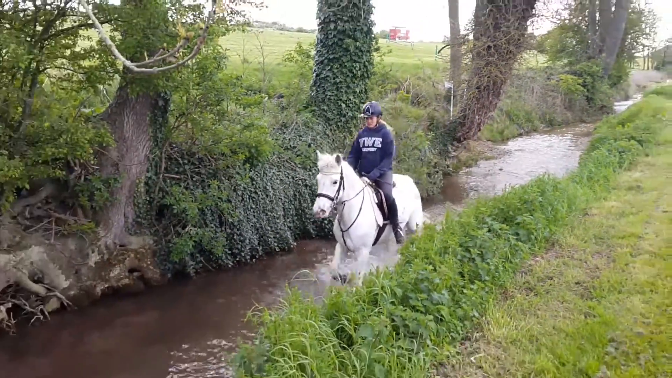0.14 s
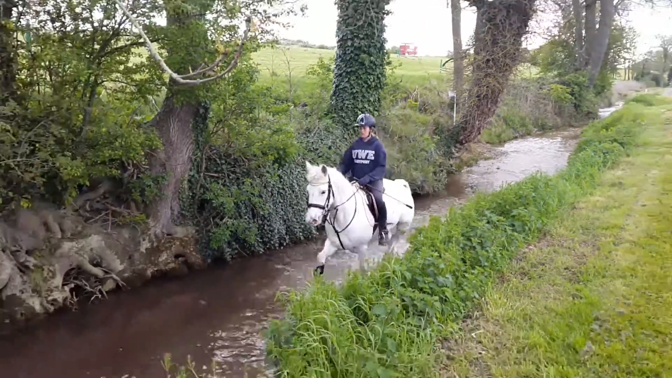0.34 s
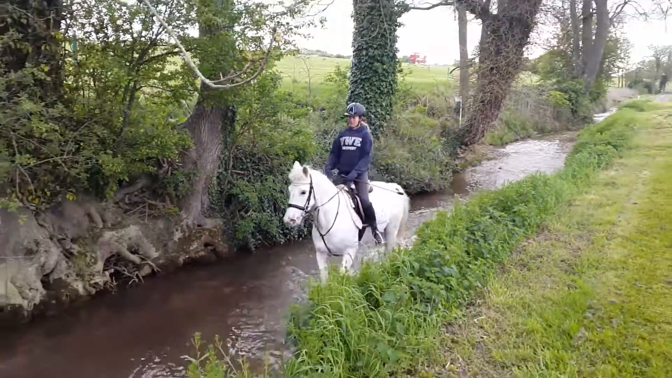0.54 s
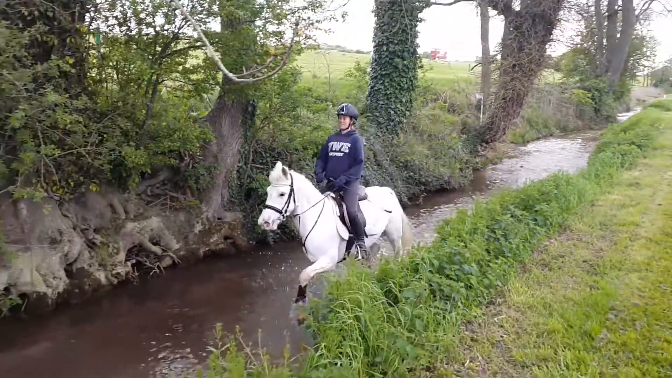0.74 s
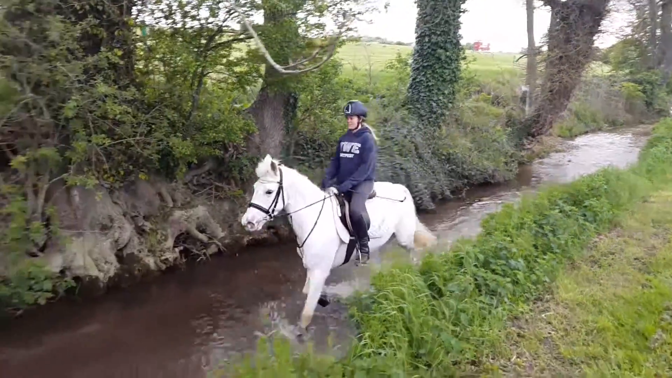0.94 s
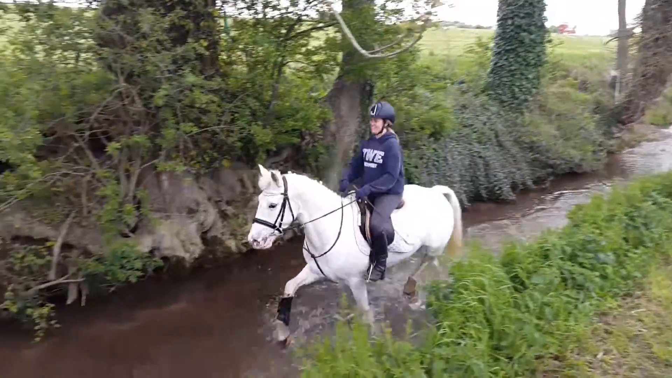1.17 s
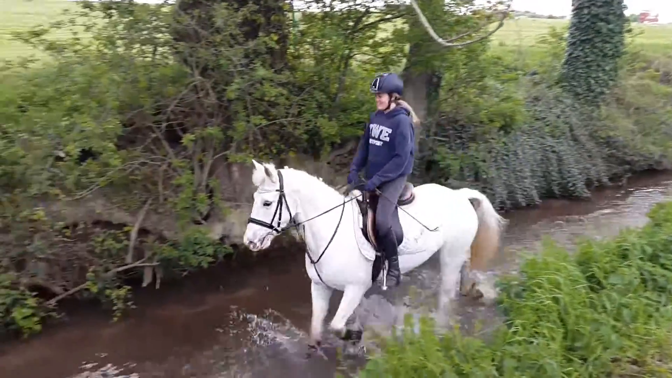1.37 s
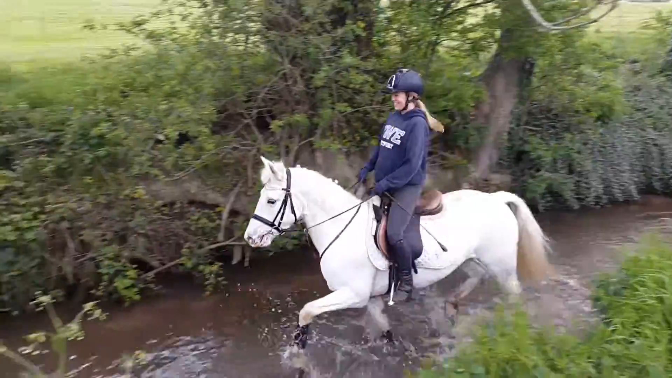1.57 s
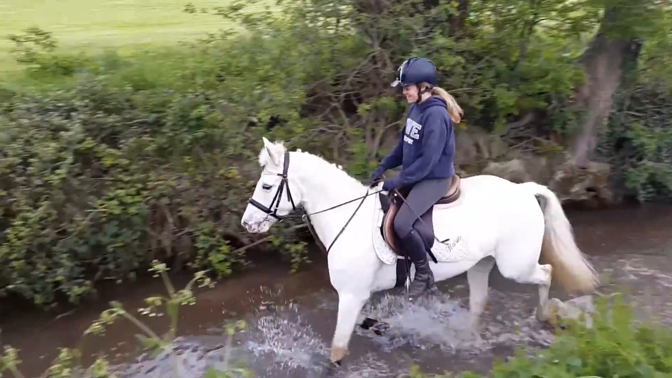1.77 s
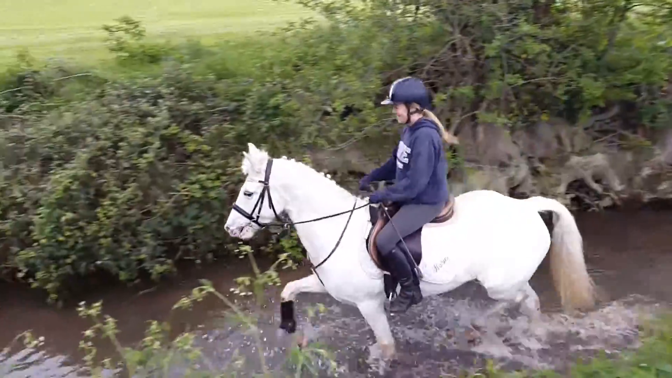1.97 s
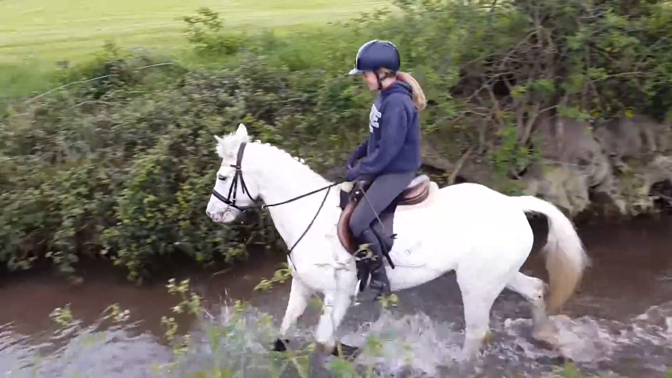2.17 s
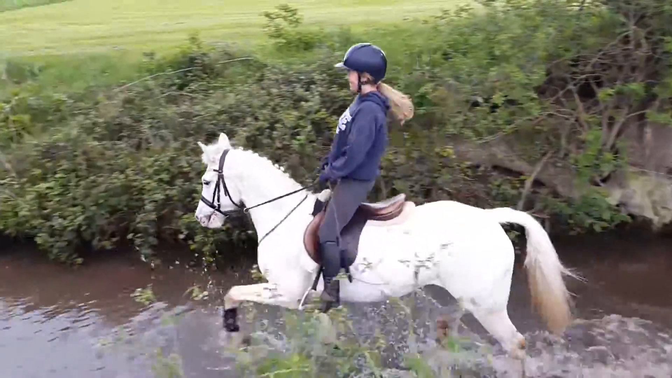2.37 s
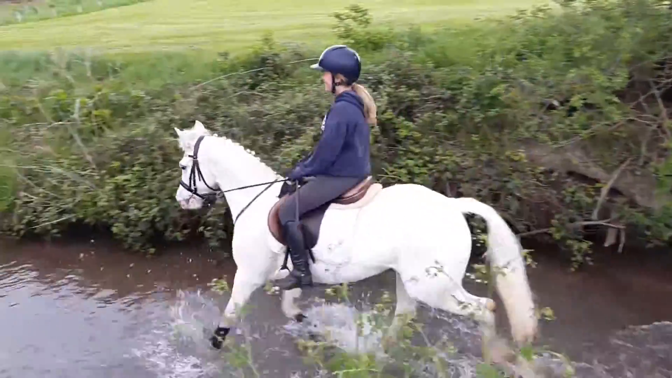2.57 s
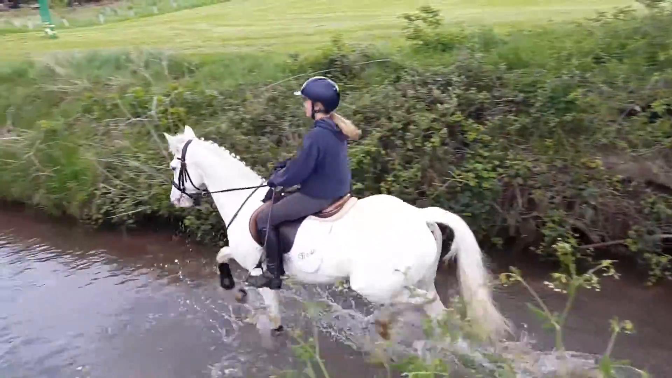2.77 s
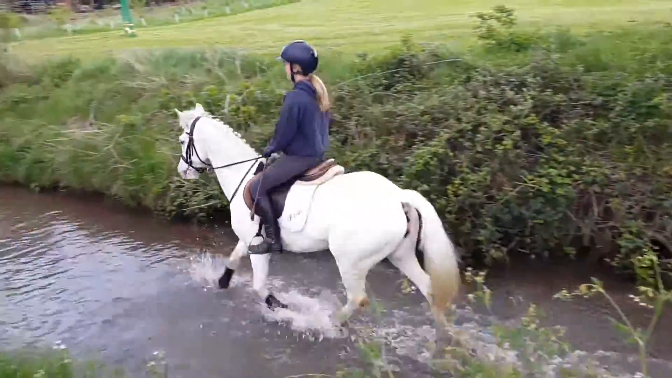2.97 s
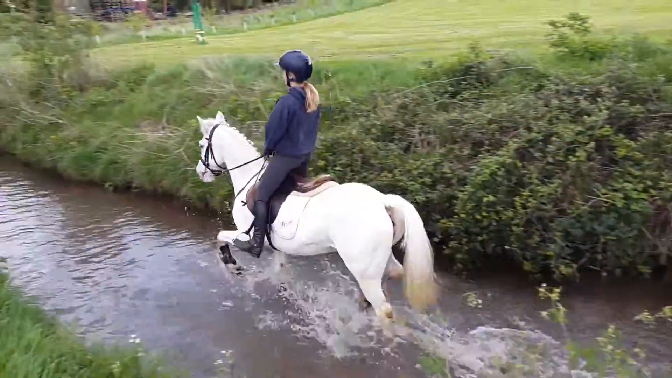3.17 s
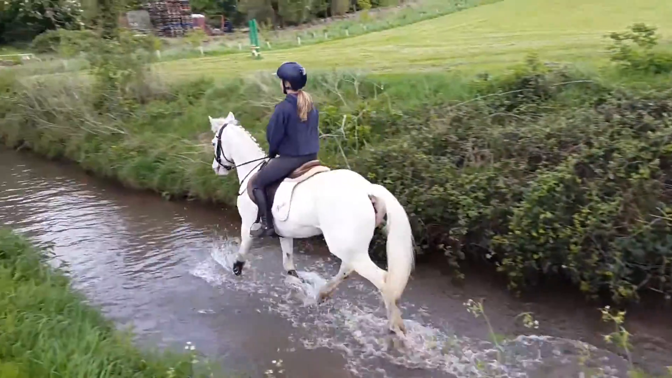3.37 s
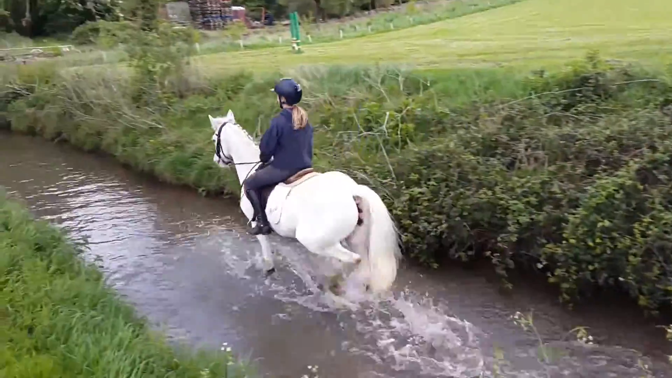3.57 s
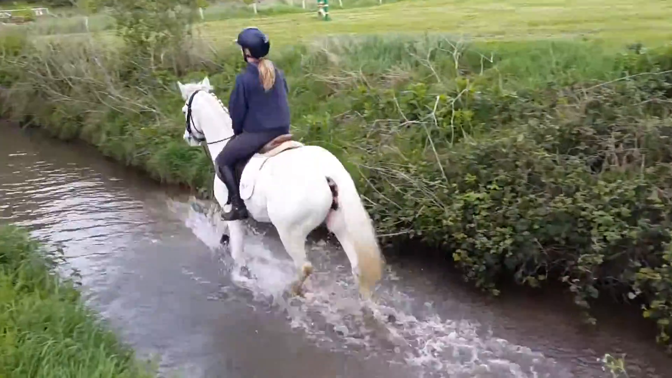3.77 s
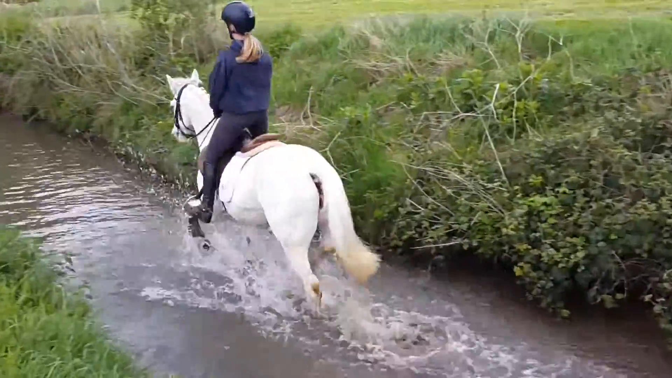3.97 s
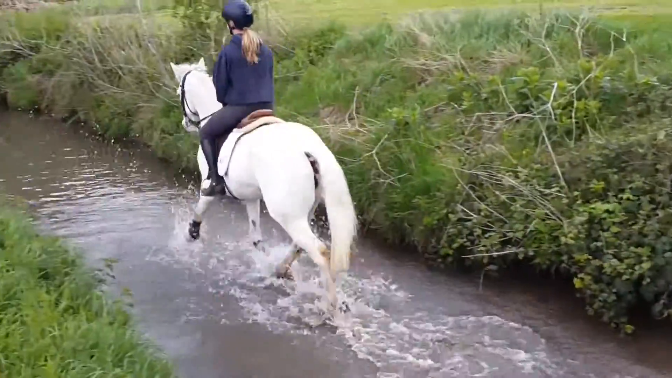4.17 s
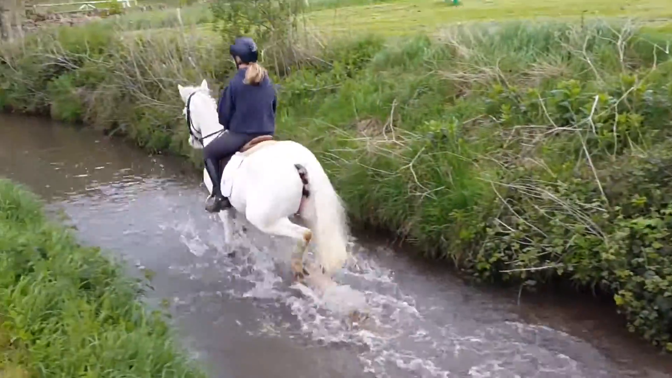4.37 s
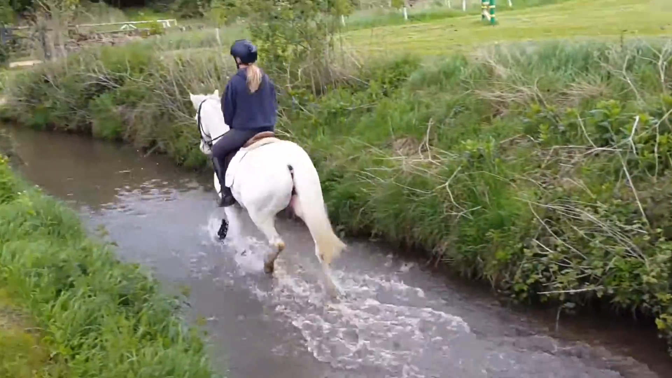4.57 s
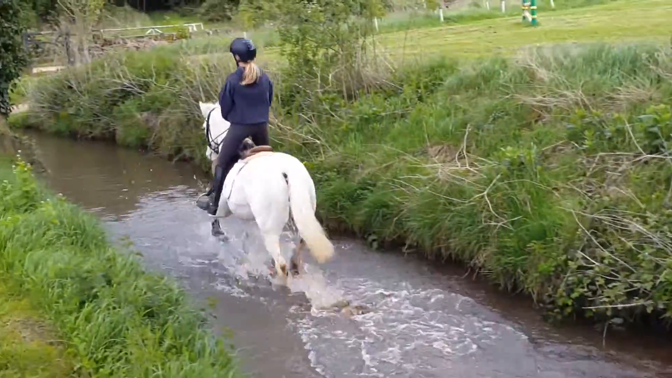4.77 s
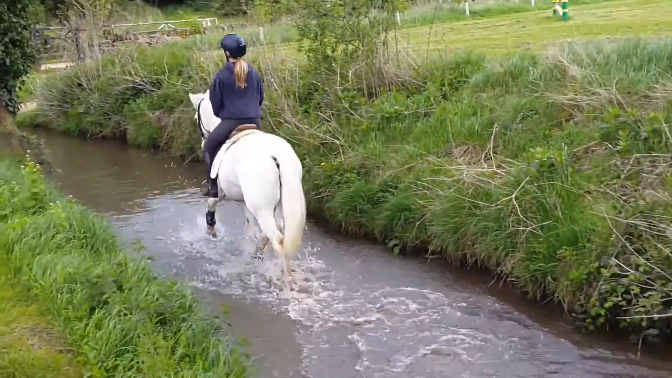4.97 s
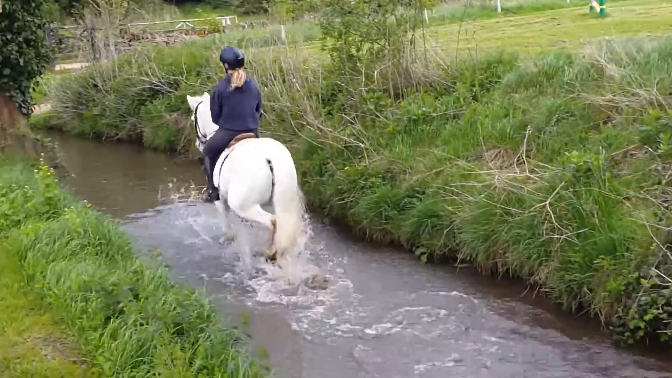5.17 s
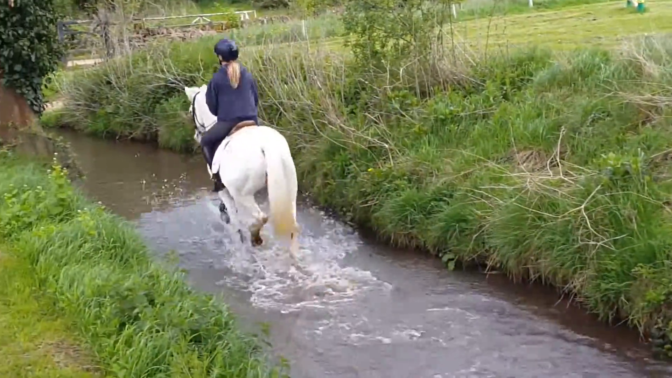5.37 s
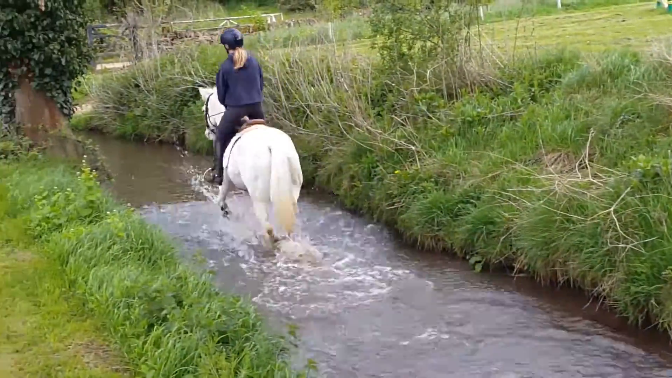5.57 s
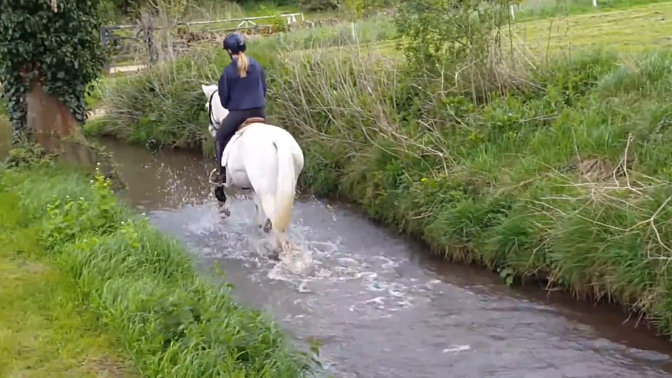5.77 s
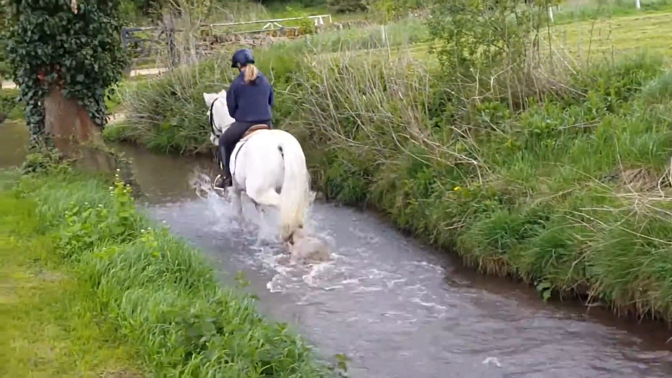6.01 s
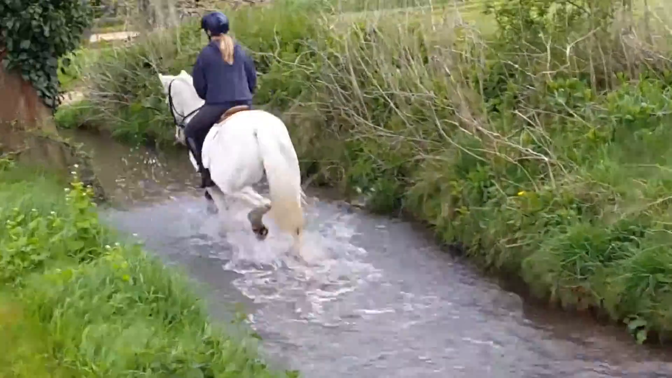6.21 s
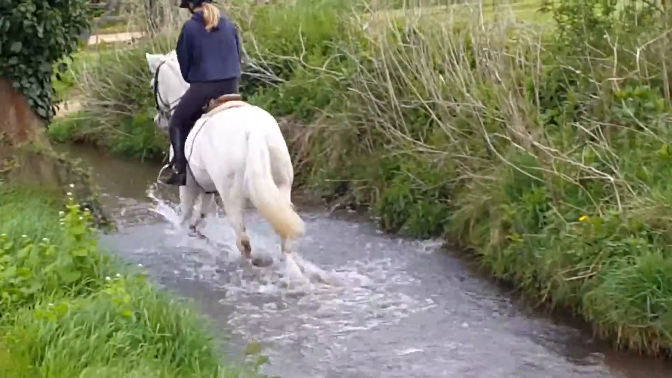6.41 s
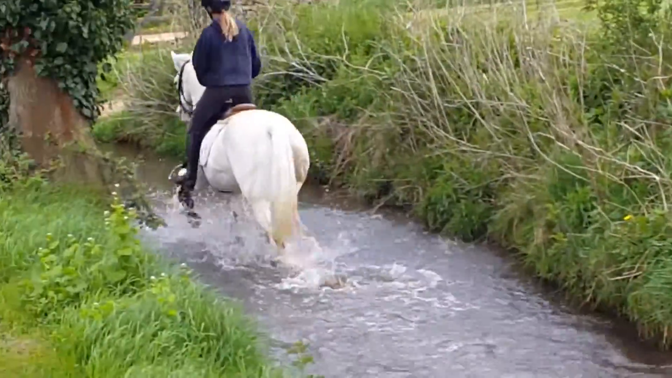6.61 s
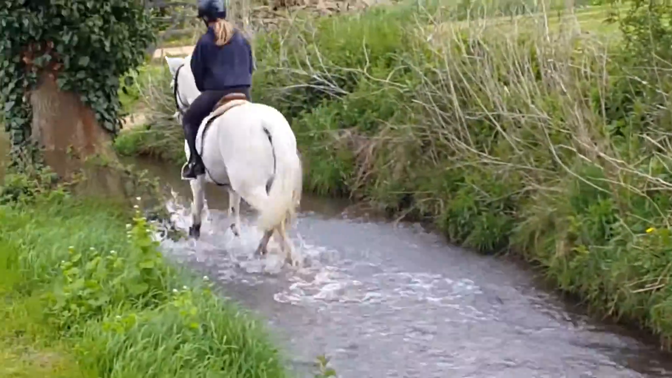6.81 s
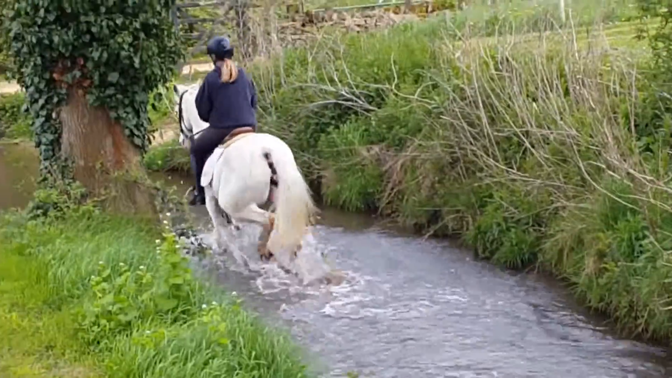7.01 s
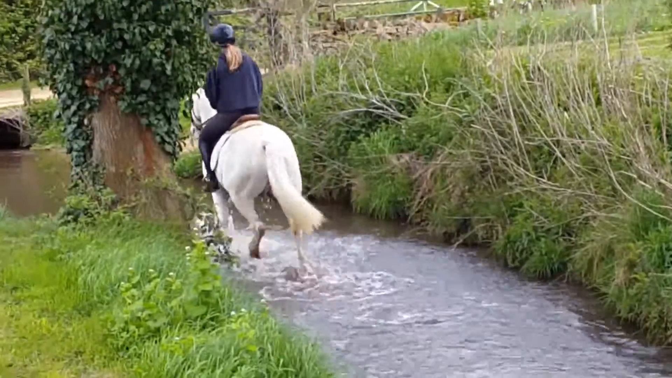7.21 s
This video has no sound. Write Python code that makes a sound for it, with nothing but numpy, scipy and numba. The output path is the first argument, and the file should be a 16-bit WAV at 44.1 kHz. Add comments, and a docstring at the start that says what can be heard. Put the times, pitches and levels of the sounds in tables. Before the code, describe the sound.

A horse trots down a shallow stream, steady rhythmic splashes with gulping, bubbling water swelling as it passes, then fading away duller.

```python
"""A horse trots down a shallow stream, passes a few metres from two microphone ports and moves away.
From the start drops patter, the wake bubbles and air rumbles faintly; at each beat the legs heave and churn
the water and throw up slosh and spray. Air pockets shut with gulps and lumps of water slap back.
From 1.6 to 3.8 s a hoof knocks stones; then the water turns duller and fainter as the horse leaves.
Nearly all of it is bubbles, each a decaying sine, summed singly or in filtered swarms."""
import sys
import numpy as np
from scipy import signal
from scipy.fft import rfft, irfft, next_fast_len
from scipy.io import wavfile
from scipy.ndimage import uniform_filter1d
from numba import njit

SR = 44100
rng = np.random.default_rng(int(sys.argv[2]) if len(sys.argv) > 2 else 0)


def wrap_up_sound(samples):
    """Save the sound to the file named by the first command line argument, as 16-bit audio."""
    columns = np.atleast_2d(samples).T
    # keep every value between -1 and 1, then stretch to whole-number steps
    tamed = np.clip(columns, -1, 1)
    steps = np.round(tamed * 32767).astype(np.int16)
    wavfile.write(sys.argv[1], SR, steps)


N = 319725
TIME = np.arange(N) / SR
TOP_HZ = 14900  # upper limit of swarm pitches and of the ports

# Spectrum of large churned bubbles. Each row: frequency in Hz, relative density in dB per Hz.
CHURN = [(65, -34), (110, -16.5), (156, -2.5), (345, -1.5), (418, -2), (515, -13), (600, -10), (780, -4),
         (1320, -120)]
# Spectrum of slosh heard from beside the horse. Each row: frequency in Hz, relative density in dB per Hz.
SLOSH_NEAR = [(310, 2.5), (520, -5), (756, 2.5), (1900, -4), (2470, -10), (4180, -120)]
# Spectrum of slosh heard from behind the horse. Each row: frequency in Hz, relative density in dB per Hz.
SLOSH_FAR = [(310, -25), (520, -9.5), (560, -10), (739, -2), (1240, -5), (1700, -37), (2210, -15),
             (3740, -120)]


def undb(db):
    """Amplitude ratio of a level: 20 dB is a factor of ten."""
    return 10 ** (np.asarray(db) / 20)


def curve(table):
    """Gain envelope by linear interpolation of level between (s, dB) rows."""
    return undb(np.interp(TIME, *np.transpose(table)))


def unit(x):
    """Normalise by energy: scale a stereo pair so that the mean of its channels has rms 1."""
    return x / np.sqrt(np.mean(x.mean(axis=0) ** 2))


def colour(x, points, power=1):
    """Linear filtering in the frequency domain, by (Hz, dB) points joined on a log-frequency axis."""
    hz, db = np.transpose(points)
    size = next_fast_len(N + 8192)  # padding keeps the tail from wrapping round
    bins = np.maximum(np.arange(size // 2 + 1) * SR / size, 1)
    gain = undb(power * np.interp(np.log(bins), np.log(hz), db))
    return irfft(rfft(x, size) * gain, size)[..., :N]


@njit
def ring(start, hz, cycles, size, glide):
    """Damped resonance: sines that swell for some cycles, then die away, their pitch rising with glide."""
    out = np.zeros(N)
    for k in range(len(start)):
        swell = cycles[k] / hz[k]
        first = max(int(start[k] * SR) + 1, 0)
        last = min(int((start[k] + 8 * swell) * SR), N)
        for i in range(first, last):
            u = (i / SR - start[k]) / swell  # age in swell times; the envelope peaks at 1
            phase = 2 * np.pi * cycles[k] * u * (1 + glide * u)
            out[i] += size[k] * u * np.exp(1 - u) * np.sin(phase)
    return out


def bubbles(start, hz, cycles, size, glide=0.008, lag_s=0):
    """Time difference between channels: each bubble has its own; lag_s is the left's mean delay on the right."""
    scatter_s = .00009
    lag = scatter_s * rng.standard_normal(len(start)) - lag_s
    cycles = cycles * np.ones(len(start))
    return np.array([ring(start + side * lag / 2, 1. * hz, cycles, 1. * size, float(glide))
                     for side in (-1, 1)])


def swarm(spectrum, per_s, cycles, spread_db, glide=0.014, lag_s=0):
    """Random superposition: bubbles of all pitches in a band, at random times, sum to a steady texture."""
    low_hz, high_hz = spectrum[0][0], min(spectrum[-1][0], TOP_HZ)
    when, pitch, life, rank = rng.random((int(per_s * N / SR), 4)).T
    hz = low_hz + (high_hz - low_hz) * pitch
    # a positive spread makes a few bubbles stand out
    size = np.sqrt(hz) * undb(-spread_db * np.log(np.maximum(rank, .004)))
    summed = bubbles(when * N / SR, hz, cycles * (.5 + life), size, glide, lag_s)
    return unit(colour(summed, spectrum))


def passing(near, far):
    """Equal-power crossfade from the water heard beside the horse to the water heard from behind it."""
    turn_away_s, turn_length_s = 3.95, 2.62  # middle and length of the fade
    away = np.clip((TIME - turn_away_s) / turn_length_s + .5, 0, 1)
    return np.sqrt(1 - away) * near + np.sqrt(away) * far


def swells(at, db, rise_s, hold_s, fall_s):
    """Exponential growth and decay: each gain rises, holds until its time, then falls away."""
    gain = np.zeros(N)
    for s, size, hold in zip(at, undb(db), hold_s * np.ones(len(at))):
        near = slice(max(int((s - .5) * SR), 0), int((s + .5) * SR))
        age = TIME[near] - s
        rise = np.minimum(age + hold, 0) / rise_s
        fall = np.maximum(age, 0) / fall_s
        gain[near] += size * np.exp(rise - fall)
    return gain


def gushes(per_s=45, decay_s=0.015, steady=5.3):
    """Shot noise: water comes down in lumps, each a jump in gain that sinks again; local rms is near 1."""
    lumps = (rng.random(N) < per_s / SR) * (.5 + rng.random(N))
    gain = steady + signal.lfilter([1], [1, -np.exp(-1 / (decay_s * SR))], lumps)
    return gain / np.sqrt(uniform_filter1d(gain ** 2, size=5000))


def trot():
    """Common excitation: each beat kicks spray, plunges and lifts water; gains of churn, slosh and drops."""
    # Trot beats: a diagonal pair of legs plunges while the other pair lifts out just after.
    # Each row: deepest point in seconds, relative churn in dB, relative slosh in dB,
    # delay of the lift in seconds, relative lifted water in dB, relative spray kicked ahead in dB.
    strides = [(0.347, -36, -40, 0.12, -37, -46), (0.796, -35.5, -39.5, 0.1, -40, -41),
               (1.24, -31.5, -39, 0.079, -35.5, -41), (1.635, -30.5, -35.5, 0.067, -36, -36.5),
               (2.04, -31.5, -32.5, 0.088, -33, -36), (2.47, -26.5, -33, 0.05, -33, -37),
               (2.872, -26, -32, 0.09, -32.5, -35.5), (3.299, -24, -31.5, 0.059, -43, -37.5),
               (3.704, -30, -31, 0.12, -31, -39.5), (4.116, -32, -33, 0.038, -35, -44.5),
               (4.52, -30, -36, 0.092, -37.5, -38.5), (4.962, -32, -38, 0.079, -40.5, -44),
               (5.365, -36.5, -36.5, 0.055, -39, -53), (5.81, -42, -38.5, 0.085, -60, -44.5),
               (6.24, -39.5, -42.5, 0.064, -39.5, -42), (6.705, -41.5, -43.5, 0.12, -45, -58),
               (7.13, -45, -44, 0.041, -44, -46.5)]
    # Shower of drops as the horse comes near and moves away. Each row: time in seconds, relative level in dB.
    shower_levels = [(0, -43.5), (.11, -44), (.16, -42), (.85, -40.5), (1.45, -38), (2.2, -36), (2.85, -34),
                     (3.85, -36.5), (4.75, -38.5), (5.4, -38.5), (6.0, -42.5), (6.6, -41), (6.9, -44.5),
                     (7.25, -44)]
    s, churn_db, slosh_db, later_s, lift_db, kick_db = np.transpose(strides)
    shower = curve(shower_levels)
    push_s = 0.089  # how long a leg drives down through the water
    # water pours off the legs that pull out
    lift = swells(s + later_s, lift_db, rise_s=0.031, hold_s=0, fall_s=0.04)
    # large bubbles build up and collapse quickly
    sink = swells(s, churn_db, rise_s=0.047, hold_s=push_s / 2, fall_s=0.045)
    # the surface breaks before the leg is deep
    splash = swells(s - 0.0019, slosh_db, rise_s=0.02, hold_s=push_s, fall_s=0.064)
    # the swinging hooves skim spray ahead of each plunge
    kick = swells(s - 0.12, kick_db, rise_s=0.16, hold_s=0, fall_s=0.12)
    # water left rocking between beats follows the shower; energies add
    plunge = np.linalg.norm([sink, undb(-4) * lift, undb(-18) * shower], axis=0)
    thrown = np.linalg.norm([splash, lift, undb(-4.5) * shower], axis=0)
    return plunge, thrown, np.hypot(shower, kick)


def wading(plunge, thrown, gush):
    """Bubble resonance: legs heave the water, churn large low bubbles into it and throw up smaller ones."""
    # Spectrum of the heave. Each row: frequency in Hz, relative density in dB per Hz.
    heave_band = [(25, -50), (40, -36), (62, -1.5), (100, 7), (140, 7), (220, -15)]
    closest_s, closest_length_s = 1.8, 0.36
    heave_lag_s = 0.022  # the mass of water rocks only once the leg is down
    # the heave is strongest while the horse is right under the bank
    close = np.exp(-((TIME - closest_s) / closest_length_s) ** 2)
    rocking = np.interp(TIME - heave_lag_s, TIME, plunge)
    heave_gain = undb(-30.5 + 10.0 * close) * rocking ** 0.49
    heave = heave_gain * swarm(heave_band, per_s=350, cycles=0.65, spread_db=2.5)
    churn = undb(-6.0) * plunge ** 0.78 * swarm(CHURN, per_s=750, cycles=1.14, spread_db=0.5)
    slosh = passing(*(swarm(band, per_s=1800, cycles=1.11, spread_db=-0.5)
                      for band in (SLOSH_NEAR, SLOSH_FAR)))
    # a few bubbles stay whole and ring on
    blips = passing(*(swarm(band, per_s=190, cycles=3.88, spread_db=0.0, glide=0.026)
                      for band in (SLOSH_NEAR, SLOSH_FAR)))
    surface = thrown * (undb(-1.5) * slosh + undb(-5.0) * blips)
    return heave + gush * (churn + surface)


def spray(shower, thrown, gush):
    """Dense impacts of drops: many brief high rings, duller once the horse has passed; sheets burst."""
    # Spectra of drops heard beside and behind the horse.
    # Each row: frequency in Hz, relative density in dB per Hz.
    spray_near = [(940, -10.5), (1600, -4), (2030, -6.5), (2340, 1.5), (2730, -7.5), (3760, -11.5),
                  (5020, -1), (6130, -5.5), (6960, -7), (10100, -15.5), (12800, -32), (14000, -34.5)]
    spray_far = [(940, -1), (1600, -4), (1890, 2), (2120, -10.5), (2370, -4), (2710, -10), (3490, -12),
                 (4830, 1.5), (5700, -10.5), (6920, -8.5), (10900, -19), (13000, -29)]
    # Sheets of water bursting into drops. Each row: start in seconds, relative level in dB, decay in seconds.
    sheets = [(0.113, -40, 0.046), (.947, -40, 0.032), (1.096, -35, 0.018), (1.292, -37, 0.035),
              (1.74, -30, 0.0033), (1.787, -27, 0.0046), (2.771, -50, 0.0033), (2.882, -31, 0.0068),
              (2.948, -28, 0.01), (3.361, -25, 0.0027), (3.47, -38.5, 0.055), (3.786, -29, 0.0084),
              (3.81, -41, 0.22), (4.208, -24.5, 0.0032), (4.571, -31, 0.0065), (4.87, -41, 0.0039),
              (5.096, -37, 0.011), (5.449, -36, 0.0097), (5.89, -32.5, 0.0045)]
    far_left_delay_s = .00005  # mean delay of the left port against the right in the distant drops
    drops = passing(*(swarm(band, per_s=17000, cycles=0.91, spread_db=-0.5, lag_s=delay)
                      for band, delay in ((spray_near, 0), (spray_far, far_left_delay_s))))
    # fat drops trap a bubble each and plink
    drops = drops + undb(-11.5) * swarm(spray_near, per_s=650, cycles=7.5, spread_db=1.5)
    # the finest fizz carries best from close by: added where the shower is loud, taken off where it is faint
    fizz = colour(drops, [(5000, -4), (8000, 2), (11000, 4.5)])
    drops = drops + fizz * ((shower / undb(-34.5)) ** .55 - 1)
    # every slosh throws a few more drops
    surge = (thrown / uniform_filter1d(thrown, size=SR // 3)) ** 0.29
    gain = undb(-0.78) * shower * surge * gush ** 1.2
    for s, db, decay_s in sheets:
        age = np.maximum(TIME - s, 0)
        gain = gain + undb(db) * (1 - np.exp(-age / 0.0016)) * np.exp(-age / decay_s)
    return gain * drops


def plops(shower):
    """Isolated bubble resonance: stray lumps of water fall back, each ringing with a rising pitch."""
    near, far = (swarm(band, per_s=55, cycles=4.75, spread_db=0.0, glide=0.0256)
                 for band in (SLOSH_NEAR, SLOSH_FAR))
    return undb(-14) * shower * passing(near, far)


def wash(shower):
    """Sustained bubble noise: the foaming wake fills the gaps between beats."""
    return undb(-13.5) * shower * swarm(CHURN, per_s=1800, cycles=1.35, spread_db=0.0)


def breeze():
    """Turbulent pressure noise: faint air rumbles at each port on its own, so the two are uncorrelated."""
    # Spectrum of air at the ports. Each row: frequency in Hz, relative density in dB per Hz.
    air_band = [(15, -26), (55, -4.5), (90, -3.5), (200, -8), (800, -42)]
    return undb(-62.5) * unit(colour(rng.standard_normal((2, N)), air_band))


def gulps(count=6):
    """Cavity closure: the air pocket behind a hoof shuts with a thump, rings on and sheds small bubbles."""
    # Air pockets closing. Each row: start in seconds, relative level in dB, pitch of the main bubble in Hz.
    pockets = [(0.008, -28, 218), (0.034, -25.5, 212), (0.334, -16, 343), (.346, -14.5, 343),
               (.36, -19.5, 286), (0.772, -20, 363), (0.874, -21, 250), (1.201, -21, 295), (1.229, -9, 256),
               (1.244, -20, 187), (1.334, -27, 273), (1.614, -20, 223), (1.633, -14, 244),
               (1.647, -21, 250), (1.694, -23.5, 260), (1.839, -25, 252), (2.007, -9.5, 393),
               (2.016, -16, 182), (2.044, -12, 297), (2.096, -15.5, 194), (2.104, -18.5, 112),
               (2.395, -10.5, 381), (2.447, -11, 330), (2.463, -12.5, 340), (2.483, -13, 372),
               (2.79, -16, 370), (2.819, -11.5, 404), (2.855, -12.5, 330), (2.875, -11, 202),
               (2.887, -14, 188), (2.953, -14.5, 363), (3.179, -19, 280), (3.279, -15, 390),
               (3.302, -8, 331), (3.316, -12, 283), (3.39, -22, 370), (3.545, -23, 285), (3.618, -28, 100),
               (3.695, -8.5, 358), (3.726, -9, 223), (4.043, -21, 258), (4.106, -14.5, 356),
               (4.121, -16, 362), (4.449, -29, 425), (4.511, -25, 208), (4.523, -18, 262),
               (4.631, -29, 304), (4.869, -25, 294), (4.942, -21, 296), (4.958, -18, 216),
               (5.291, -22, 272), (5.355, -19, 324), (5.715, -24, 294), (5.794, -22, 295),
               (5.811, -21, 313), (6.206, -16.5, 285), (6.238, -17, 268), (6.702, -23.5, 278),
               (7.045, -29, 245), (7.107, -28, 293), (7.122, -26, 274)]
    s, db, hz = np.transpose(pockets)
    out = bubbles(s, hz * 0.913, 0.7, undb(db - 5.0))
    # large pockets break up at once; smaller ones hold together and ring louder
    out += bubbles(s + 1 / hz, hz, 1.68, undb(db - 15) * (hz / 330) ** 2.0)
    for _ in range(count):
        delay, pitch = rng.random((len(s), 2)).T
        # the neck of the pocket tears into bubbles both as it narrows and after it shuts
        out += bubbles(s + 0.0181 * (delay - .3), hz * 2 ** (.4 + 1.4 * pitch), 1.26, undb(db - 21.0))
    return out


def slaps(count=9):
    """Impact and entrainment: a lump of water knocks, traps a main bubble and a quick trail of others."""
    # Lumps hitting the surface. Each row: start in seconds, relative level in dB, main bubble pitch in Hz.
    lumps = [(.262, -34, 940), (0.948, -20, 1050), (1.111, -24, 1210), (1.228, -19.5, 1110),
             (1.636, -22, 810), (2.018, -24, 930), (2.038, -21, 854), (2.096, -14, 755), (2.128, -27, 750),
             (2.374, -17, 1090), (2.513, -23, 830), (2.819, -13.5, 1050), (2.85, -17, 1180),
             (2.87, -12.5, 896), (2.952, -15, 833), (3.212, -20, 1030), (3.266, -14.5, 1360),
             (3.304, -17.5, 870), (3.374, -24, 864), (3.62, -24, 1050), (3.651, -18, 1400),
             (3.665, -17.5, 1040), (3.696, -20, 717), (4.096, -14, 650), (4.18, -17, 713),
             (4.447, -23, 824), (4.509, -22, 664), (4.57, -20, 1240), (4.614, -26, 1040), (4.923, -22, 704),
             (5.096, -20, 1070), (5.116, -27, 860), (5.354, -20, 885), (5.747, -22.5, 790),
             (5.889, -31, 1010), (6.161, -25, 814), (6.2378, -21.5, 950), (6.311, -31, 940),
             (6.4, -23.5, 965), (6.667, -24, 892), (6.772, -26.5, 1220), (6.995, -31, 1090),
             (7.052, -29, 955), (7.119, -27, 1110)]
    s, db, hz = np.transpose(lumps)
    knock = bubbles(s, hz * 0.823, 0.59, undb(db - 7.0))
    main_bubble = bubbles(s + 1 / hz, hz, 1.84, undb(db - 5.5))
    out = knock + main_bubble
    for _ in range(count):
        delay, pitch = rng.random((len(s), 2)).T
        trail_hz = hz * 2 ** (1.2 * (pitch - .35))
        out += bubbles(s + 0.019 * delay ** 1.417, trail_hz, 0.93, undb(db - 9.0 - 3.1 * delay))
    return out


def stones():
    """Impulsive contact exciting a damped mode: knocked stones crack, ring briefly and are damped."""
    # A hoof knocking stones.
    # Each row: start in seconds, relative level in dB, pitch in Hz, length of the swell in cycles.
    knocks = [(1.6155, -18.5, 2260, 1.2), (2.959, -20, 3000, 0.8), (3.7873, -19, 2030, 0.5),
              (3.7878, -12.3, 5150, 1.5), (3.7985, -19.5, 2460, 1.8)]
    crack_db, crack_s, crack_top_hz = -5, .0016, 7500
    s, db, hz, cycles = np.transpose(knocks).copy()
    age = TIME - s[:, None]
    # the higher the stone's pitch, the stronger its crack
    strength = undb(db + crack_db) * hz / hz.max()
    contact = strength @ ((age > 0) * np.exp(-np.abs(age) / crack_s))
    # the water over the stone dulls the crack
    dulling = signal.butter(2, crack_top_hz, fs=SR, output="sos")
    crack = signal.sosfilt(dulling, contact * rng.standard_normal((2, N)))
    return ring(s, hz, cycles, undb(db + 1.0), 0.) + crack


def scene():
    """Superposition of sources: the trot drives the water, and one run of gushes shakes wading and spray."""
    gush = gushes()
    plunge, thrown, shower = trot()
    water = wading(plunge, thrown, gush) + spray(shower, thrown, gush) + plops(shower) + wash(shower)
    return water + gulps() + slaps() + stones() + breeze()


def record(dry):
    """Transfer functions of the ports: each has its own colour; both lose the deepest bass and the top."""
    # Contrast of colour between the ports, scaled by 0.34 at the left and by -0.8 at the right.
    # Each row: frequency in Hz, relative contrast in dB.
    port_contrast = [(100, 0), (350, 1), (750, 2.5), (1100, 2.5), (1500, 5.5), (2300, 4), (2900, -3.5),
                     (3600, -5), (4300, 0.5), (5000, 7), (6000, 1), (7000, -7), (9000, -2), (12000, -10)]
    ports = np.array([colour(dry[0], port_contrast, 0.34), colour(dry[1], port_contrast, -0.8)])
    low_cut = signal.butter(2, 42, "highpass", fs=SR, output="sos")  # Hz
    ports = signal.sosfilt(low_cut, ports)
    return signal.sosfilt(signal.ellip(10, .2, 80, TOP_HZ, fs=SR, output="sos"), ports)


dry = scene()
out = record(dry)
wrap_up_sound(out)
```